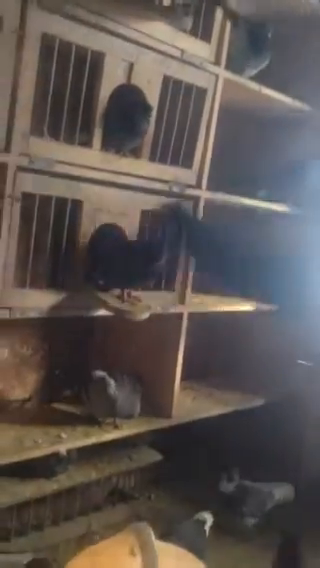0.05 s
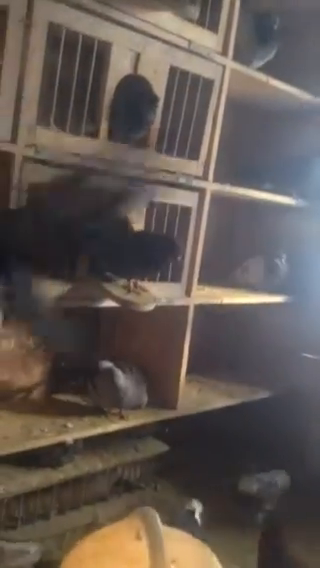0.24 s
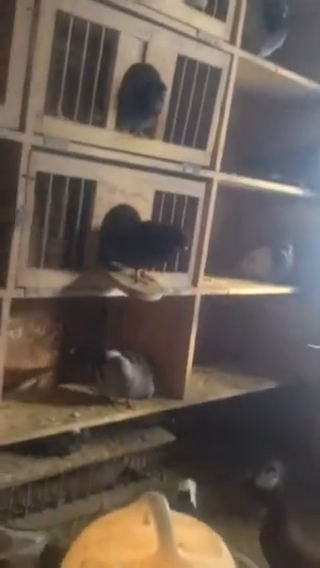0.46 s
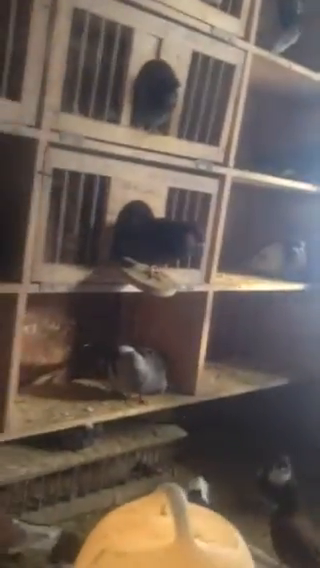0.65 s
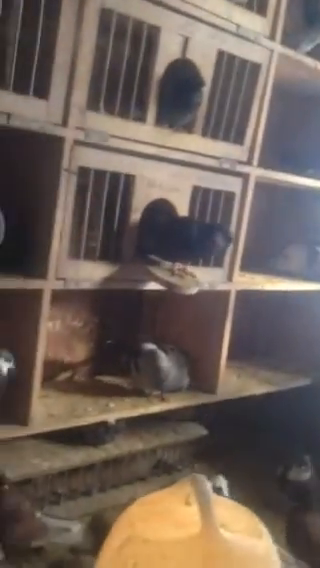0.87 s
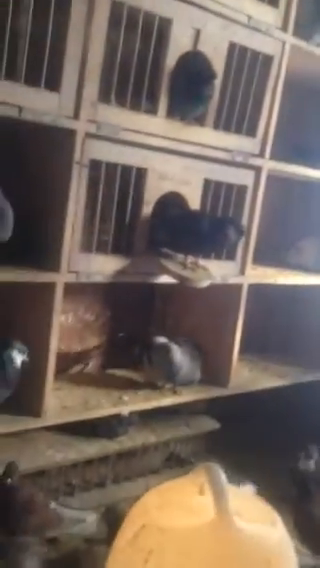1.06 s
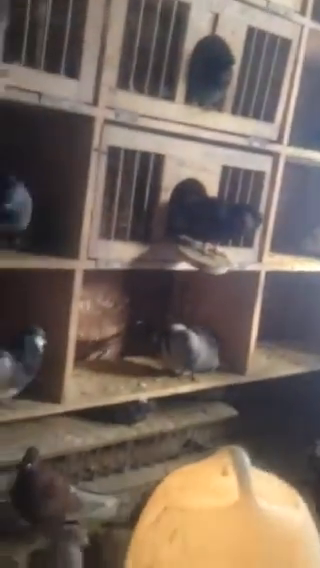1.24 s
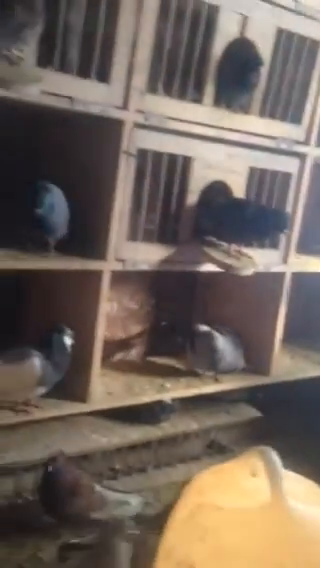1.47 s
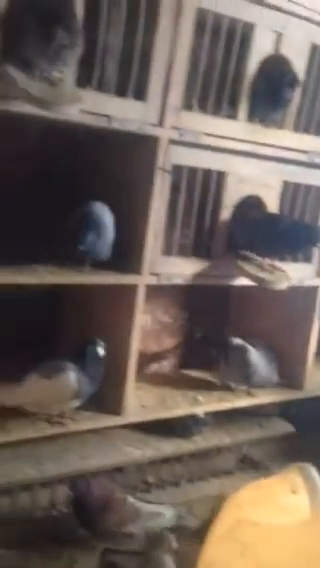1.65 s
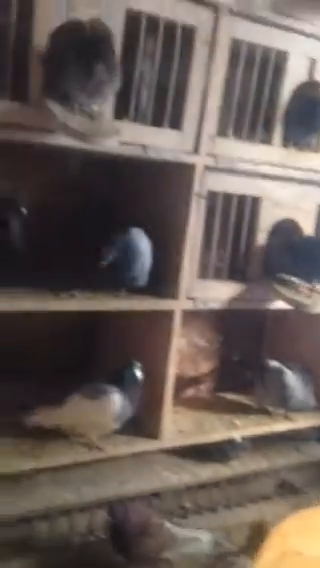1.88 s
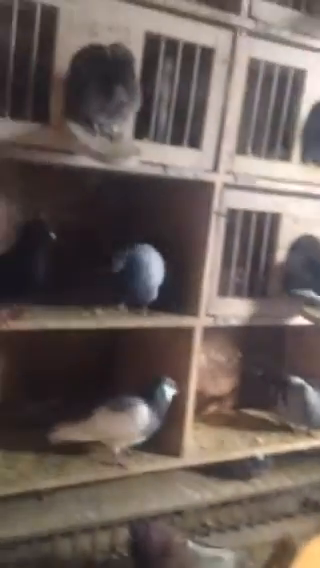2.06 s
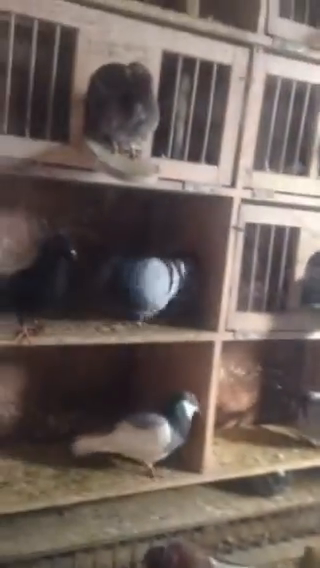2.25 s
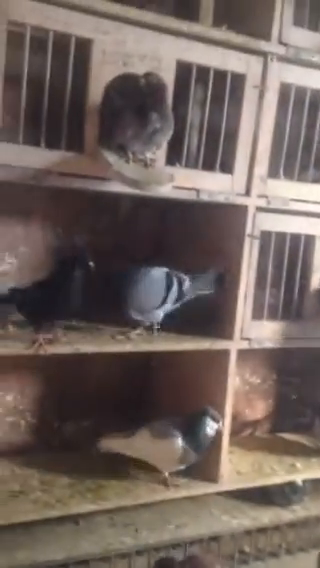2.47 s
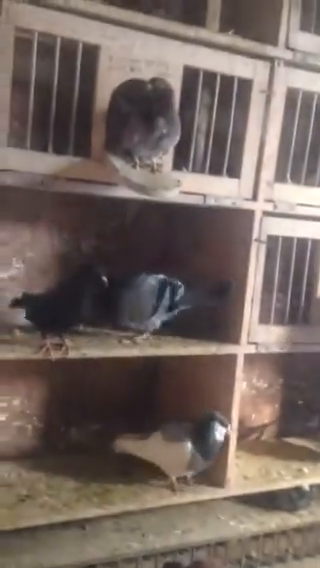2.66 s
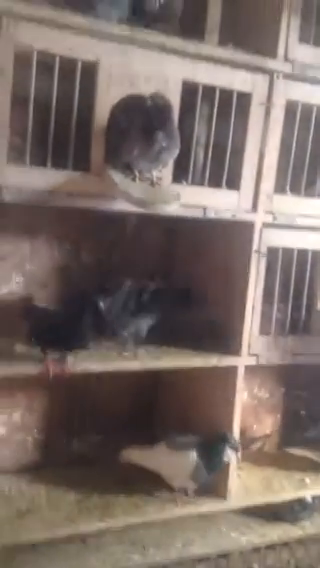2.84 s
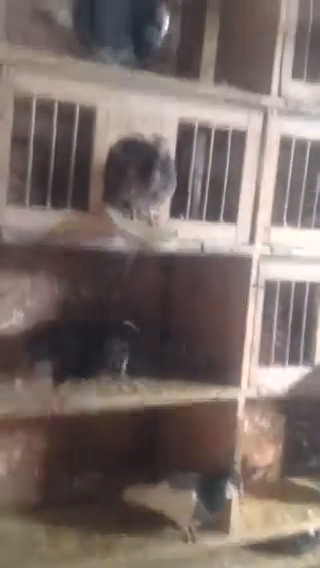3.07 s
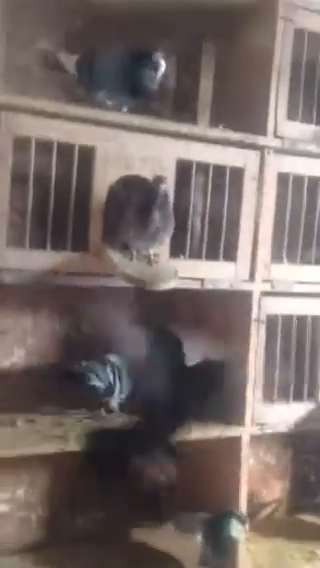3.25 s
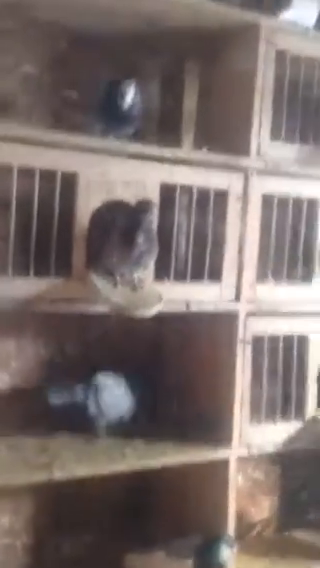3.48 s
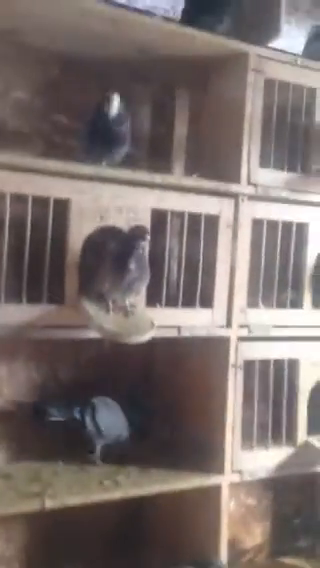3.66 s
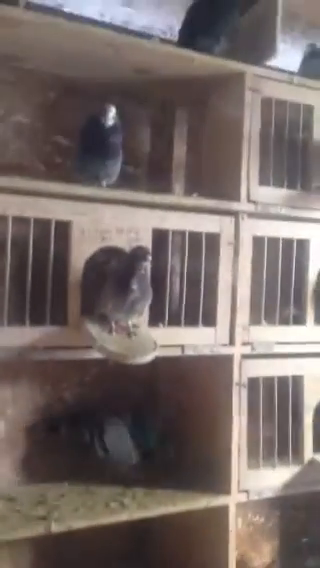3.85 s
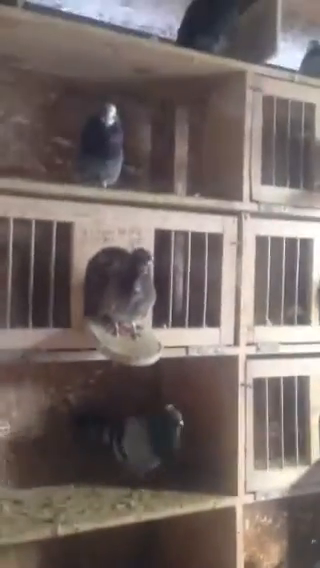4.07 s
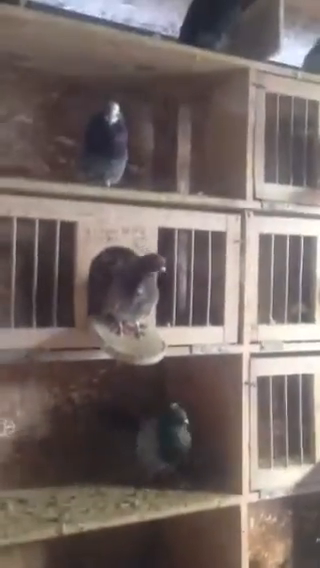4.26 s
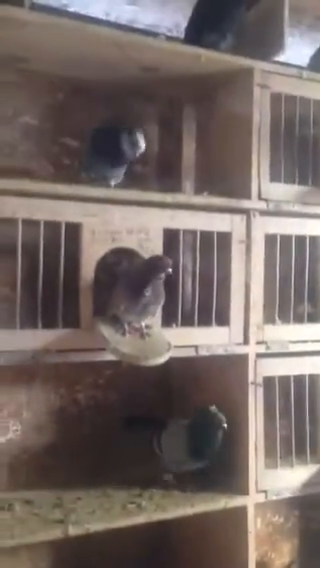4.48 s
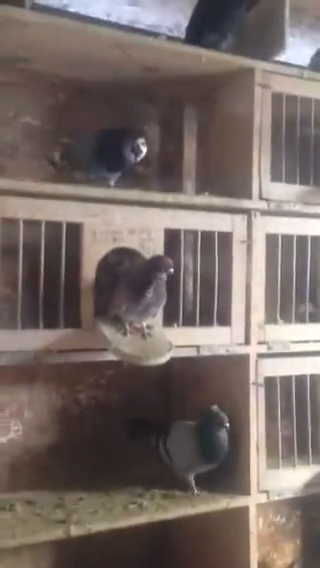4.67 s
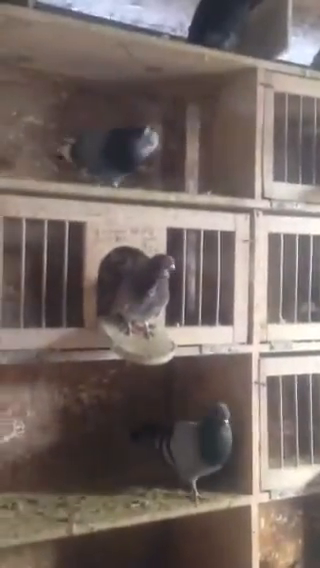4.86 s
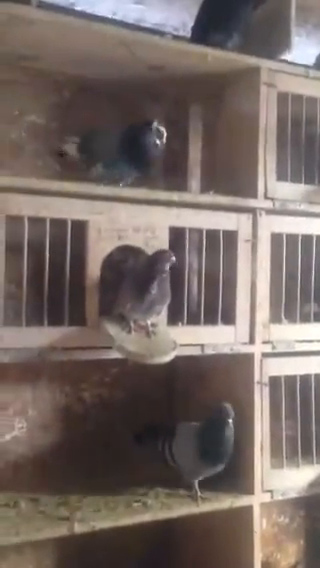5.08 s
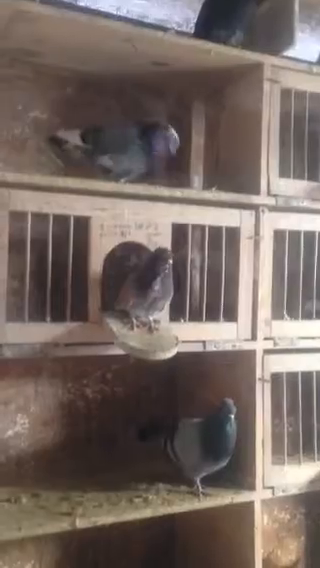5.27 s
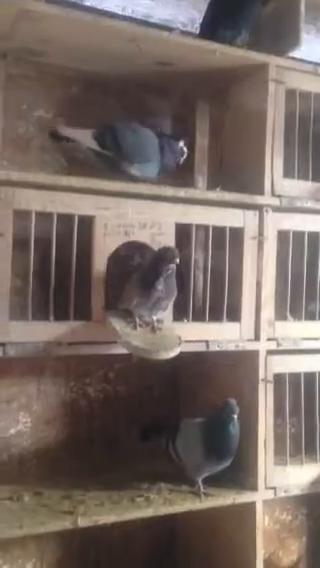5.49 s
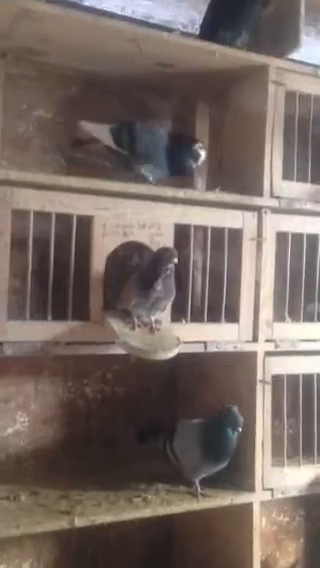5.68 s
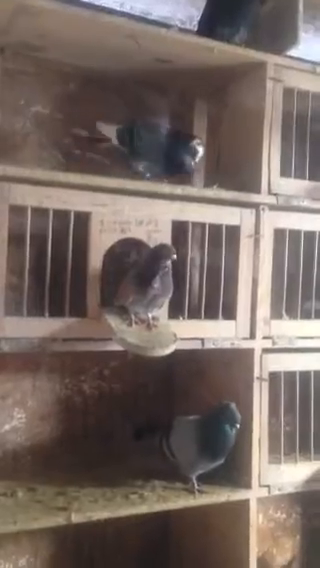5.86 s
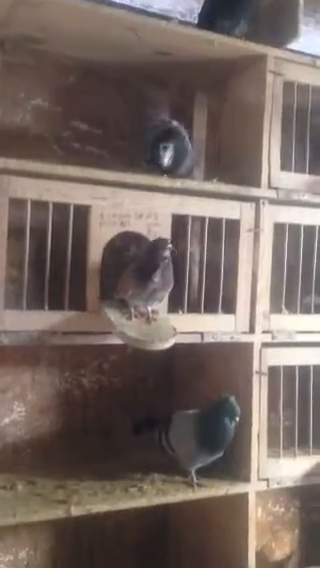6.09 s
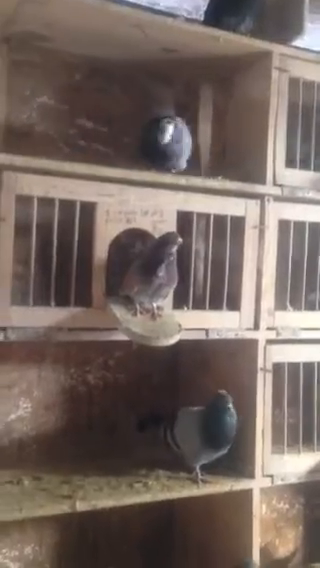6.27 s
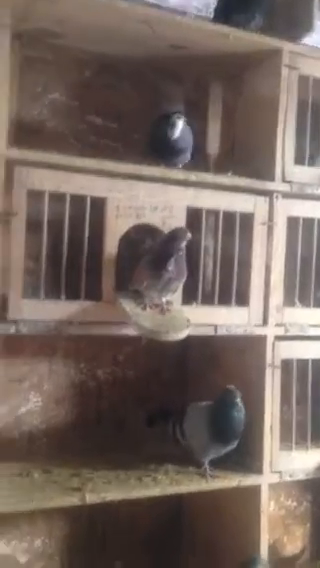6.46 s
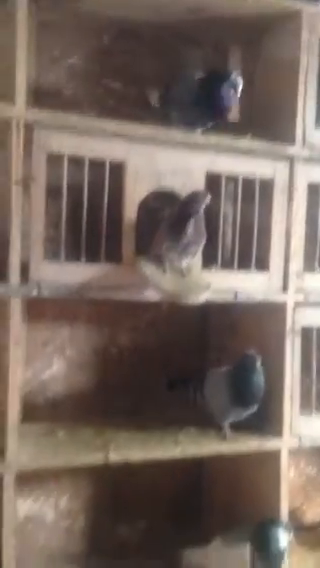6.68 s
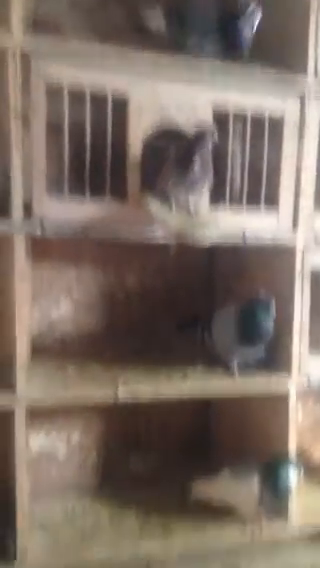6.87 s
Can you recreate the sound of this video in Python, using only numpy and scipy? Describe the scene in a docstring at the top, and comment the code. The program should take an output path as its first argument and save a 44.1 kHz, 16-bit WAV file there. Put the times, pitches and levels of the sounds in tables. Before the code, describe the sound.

Close handheld microphone among pigeons in nest boxes. Hard wing claps and a ringing rattle of bars open the scene, then deep throaty coos overlap with higher moans and abrupt grunts from near birds. Around the middle come sharp wooden knocks, a thud and fluttering feathers. A strong grunt follows, then quieter purring, faint peeps and short soft hoots in a dry room.

```python
"""Inside a small wooden pigeon loft: a rolling chorus of farther birds over still air and low rumble.
At once feet and beaks tap the boards, one bird flies past with clapping wings and a young bird peeps.
Near grunts and full coos, near sines chopped by a rolling throat, then stand out of the chorus; rolled coos
and gliding moans join from the nest boxes. Around 3 s two birds scuffle in a nest box, with bursts of
feather noise, knocks and ringing wood; a few wing strokes follow, and two smooth hoots come near the end."""
import sys
import numpy as np
from scipy import signal
from scipy.fft import rfft, irfft
from scipy.io import wavfile
from scipy.ndimage import uniform_filter1d

SR = 44100
rng = np.random.default_rng(int(sys.argv[2]) if len(sys.argv) > 2 else 0)


def dump(signal):
    """Clip the signal to [-1, 1] and save it as 16-bit WAV at the path in sys.argv[1]."""
    limited = np.clip(np.atleast_2d(signal).T, -1, 1)
    pcm = np.round(limited * 32767).astype(np.int16)
    wavfile.write(sys.argv[1], SR, pcm)


N = 305613
TIME = np.arange(N) / SR  # s


def from_db(db):
    """Amplitude factor of a level in dB."""
    return 10 ** (np.asarray(db) / 20)


def rms_one(x):
    """Scale a sound to rms 1."""
    return x / np.sqrt(np.mean(x ** 2) + 1e-20)


def in_time(rows, t=TIME):
    """The columns of a curve, joined by straight lines."""
    s, *columns = np.transpose(rows)
    return [np.interp(t, s, column) for column in columns]


def drift(rate, t=TIME):
    """Normal random values, a given number a second, joined by straight lines."""
    return np.interp((t - t[0]) * rate, np.arange(1024), rng.standard_normal(1024))


def noise(colour, size=N, tilt_db=0):
    """Noise with a given spectrum, tilted in dB per octave; rms 1."""
    hz = np.fft.rfftfreq(size, 1 / SR) + 1
    points, levels = np.transpose(colour)
    db = np.interp(np.log(hz), np.log(points), levels)
    db = db + tilt_db * np.log2(np.maximum(hz, points[0]))
    low_cut = hz ** 2 / (hz ** 2 + (points[0] / 2) ** 2)
    spectrum = rfft(rng.standard_normal(size)) * from_db(db) * low_cut
    return rms_one(irfft(spectrum, size))


def add(out, start, sound):
    """Mix a sound in from a given time; one due before zero begins at zero."""
    i = max(int(start * SR), 0)
    out[i:i + len(sound)] += sound[:max(N - i, 0)]


LOFT_T60_S = 0.11


def loft(x, first_s=0.00628):
    """Dense reflections from near wooden walls, dying quickly."""
    t = np.arange(SR // 2) / SR
    echoes = rng.standard_normal(len(t)) * from_db(-60 * t / LOFT_T60_S) * (t > first_s)
    return signal.fftconvolve(x, echoes / np.linalg.norm(echoes))[:N]


# rasp of a rolling throat: depth at full roll, and irregularities a second
RASP, RASP_PER_S = .22, 400


def syrinx(t, hz, roll, roll_hz=35, bend=0.077, sharpness=0.71, second_db=-37):
    """A near sine, overtones swallowed by the crop; rolling chops it into raspy, pitch-bending pulses."""
    beat = 2 * np.pi * np.cumsum(roll_hz * np.exp(.24 * drift(25, t))) / SR
    pulses = (.5 + .5 * np.cos(beat)) ** sharpness * from_db(3 * drift(35, t))
    swell = rms_one(1 - roll + roll * 2 * pulses)
    pitch = hz * (1 + roll * (.055 * drift(70, t) - bend * np.sin(beat)))
    phase = 2 * np.pi * np.cumsum(pitch) / SR
    rasp = drift(RASP_PER_S, t) * np.sin(phase) + drift(RASP_PER_S, t) * np.cos(phase)
    octave = from_db(second_db) * np.sin(2 * phase)
    return swell * np.sqrt(2) * (np.sin(phase) + RASP * roll * rasp + octave)


# no bird holds its pitch: share by which it wanders at half roll, and turns a second
WANDER, WANDER_PER_S = 0.01997, 16.11
OVERTONE_DB = -37  # the octave above a call, at half roll


def call(stages, fade_s=0.01186, **throat):
    """A wandering voice passes through stages (t/s, f/Hz, level/dB, roll), opening and closing softly."""
    out = np.zeros(N)
    t = np.arange(stages[0][0] - fade_s / 2, stages[-1][0] + fade_s / 2, 1 / SR)
    hz, db, roll = in_time(stages, t)
    roll = np.clip(roll, 0, 1)
    hz = hz * (1 + WANDER * 2 * roll * drift(WANDER_PER_S, t))
    to_edge_s = np.minimum(t - t[0], t[-1] - t)
    gate = np.sin(np.pi / 2 * np.clip(to_edge_s / fade_s, 0, 1)) ** 2
    second_db = OVERTONE_DB + 20 * np.log10(roll + .5)
    add(out, t[0], gate * from_db(db) * syrinx(t, hz, roll, second_db=second_db, **throat))
    return out


def notes(rows, swell_s, fade_s, sag):
    """Very short sine notes that swell, fade, quaver and sag in pitch."""
    out, t = np.zeros(N), np.arange(SR // 5) / SR - 1 / 10
    shape = np.exp(-(t / np.where(t < 0, swell_s, fade_s)) ** 2)
    for s, db, hz in rows:
        quaver = .035 * drift(300, t)
        pitch = hz * (1 + quaver - sag * np.tanh(t / fade_s))
        phase = 2 * np.pi * (np.cumsum(pitch) / SR + rng.random())
        add(out, s + t[0], from_db(db) * shape * np.sin(phase))
    return out


def struck(blows, modes):
    """A struck body rings with its modes, each a sine dying at its own rate."""
    out, t = np.zeros(N), np.arange(SR // 3) / SR
    for s, db in blows:
        for hz, mode_db, t60 in modes:
            ring = from_db(db + mode_db - 60 * t / t60) * np.sin(2 * np.pi * hz * t)
            add(out, s, rng.choice([-1, 1]) * ring)
    return out


def chorus(low_hz, high_hz, top_hz, count=28):
    """Farther birds overlap at random; each coo rises, holds and sags. Steady level, rms near 1."""
    out, t = np.zeros(N), np.arange(int(.7 * SR)) / SR
    along = t / t[-1]
    arch = np.interp(along, [0, .3, .7, 1], [.88, 1, 1, .75])
    for k, (when, voice) in enumerate(rng.random((count, 2))):
        hz = arch * (low_hz + voice * (high_hz - low_hz))
        coo = np.sin(np.pi * along) * syrinx(t, hz, .7)
        start = (k + when) / count * (TIME[-1] + t[-1]) - t[-1]
        add(out, start, coo[max(int(-start * SR), 0):])  # begins mid-coo if already calling
    band = signal.butter(2, [200, top_hz], "band", fs=SR, output="sos")
    out = signal.sosfilt(band, out + from_db(5.5) * loft(out))
    return out / np.sqrt(uniform_filter1d(out ** 2, SR // 6) + 1e-9)


# the rest of the flock, farther off: t/s, deep voices level/dB, high voices level/dB
FLOCK_LEVELS = [(0,-43,-53.5), (.55,-34.5,-46), (.72,-36.5,-47.5), (.95,-47,-41), (1.19,-44.5,-49),
                (1.9,-43,-44), (2.3,-32,-44), (2.6,-47,-42), (3.3,-43.5,-43), (3.9,-40,-40),
                (4.5,-47,-48.5), (5.8,-44.5,-50.5), (6.12,-49.5,-59.5), (6.6,-46,-70), (6.8,-49.5,-45)]


def flock():
    """A deep and a high chorus, each rising and falling in level."""
    deep_db, high_db = in_time(FLOCK_LEVELS)
    deep = from_db(deep_db) * chorus(285, 400, 455)
    return deep + from_db(high_db) * chorus(410, 520, 780)


def scratches(per_s=35, decay_s=0.006, size_db=-2.5):
    """Claws and feathers brush the boards at random; a gain that rides on the stirring."""
    sizes = from_db(size_db + 3 * np.clip(rng.standard_normal(N), -2, 2))
    touches = (rng.random(N) < per_s / SR) * sizes
    return 1 + signal.lfilter([1], [1, -np.exp(-1 / (decay_s * SR))], touches + 1e-18)


# feathers and feet stirring, before flicker and scratches: t/s, level/dB
STIR_LEVELS = [(0, -53), (.45, -45.5), (.72, -60), (2.03, -62), (3.07, -58), (3.38, -47), (3.9, -54.5),
               (5.38, -61.5), (6.14, -55.5), (6.93, -63)]
# spectrum of a light touch on the boards: f/Hz, relative level/dB per Hz
TOUCH_COLOUR = [(400, 21), (800, 7), (1300, 3.5), (2000, -5.5), (2700, -3), (3600, -2), (5000, -20),
                (8000, -20), (14000, -39)]


def stirring():
    """Feathers and feet: flickering noise roughened by scratches."""
    level = from_db(in_time(STIR_LEVELS)[0] + 2.28 * drift(45))
    return level * scratches() * noise(TOUCH_COLOUR)


# low rumble in the loft, before its waver: t/s, level/dB
RUMBLE_LEVELS = [(.4, -44), (1.1, -52), (3.38, -48.5), (6.2, -53.5), (6.93, -53)]
# its spectrum: f/Hz, relative level/dB per Hz
RUMBLE_SPECTRUM = [(25, -17), (55, -8.5), (80, -1.5), (100, -6), (125, -8), (160, -11.5), (230, -2.5),
                   (400, -26.5), (900, -69.5)]
RUMBLE_WAVER_DB = 2.5


def low_rumble():
    """Low noise whose level wavers at random."""
    level = from_db(in_time(RUMBLE_LEVELS)[0] + RUMBLE_WAVER_DB * drift(14))
    return level * noise(RUMBLE_SPECTRUM)


# spectrum of the still air: f/Hz, relative level/dB per Hz
AIR_COLOUR = [(200, 5.5), (550, 2.5), (750, -13), (1100, -41.5), (1800, -26), (7500, -29), (15000, -32.5)]
AIR_DB = -50.5


def still_air():
    """Steady faint noise of the loft."""
    return from_db(AIR_DB) * noise(AIR_COLOUR)


# feet and beaks on the boards: t/s, level of the wood/dB, f of the knock/Hz
TAP_BLOWS = [(.028, -35, 740), (1.079, -51, 1290), (1.532, -41, 840), (1.539, -42, 2150), (1.959, -42, 815),
             (1.968, -51.5, 1790), (2.335, -47.5, 3360), (3.129, -51, 2700), (3.182, -34.5, 990),
             (3.185, -47, 2270), (3.197, -54, 1060), (3.376, -34, 1030), (4.151, -43, 1580),
             (4.223, -53.5, 2840)]


def taps(sharpness=2.5, click_db=-6):
    """A short scratchy contact wakes one broad resonance of the wood."""
    out, t = np.zeros(N), np.arange(SR // 10) / SR
    fade = np.exp(-t / .003)
    for s, db, hz in TAP_BLOWS:
        contact = noise(TOUCH_COLOUR, len(t))
        wood = rms_one(signal.lfilter(*signal.iirpeak(hz, sharpness, fs=SR), contact))
        add(out, s, from_db(db) * fade * (wood + from_db(click_db) * contact))
    return out


# wing strokes: t/s, crest level before grain/dB, treble tilt/dB per octave, swell/s, hold/s
WING_STROKES = [(0.096,-50,5,0.00072,.002), (0.177,-47,-1.5,0.0052,0.0037), (0.25,-50.5,-1,.004,0.0045),
                (0.298,-31,0.5,0.0032,0.0056), (0.318,-36,-3.5,0.0018,0.0018),
                (0.4234,-31,2,0.00059,0.0066), (0.553,-41.5,-0.5,0.0008,0.0067),
                (3.298,-47.5,-9.5,0.0097,0.013), (3.378,-55,15,.001,0.0065), (3.486,-39,0.5,0.0012,0.0083),
                (3.907,-52,2,0.00078,0.0022), (4.115,-56,1.5,0.0084,.004), (4.145,-54,-1.5,0.011,0.013),
                (4.964,-50,-1,0.0011,0.016)]
# spectrum of the feathers before tilt: f/Hz, relative level/dB per Hz
FEATHER_COLOUR = [(200, -11.5), (600, -0.5), (1000, -0.5), (1700, -2.5), (2450, -2), (3000, -3.5),
                  (4000, -2.5), (5500, -14), (8000, -20.5), (11000, -41.5), (15000, -38)]
# the decay at a middling stroke, and the extra strength that halves it
WING_DECAY_S, WING_MIDDLING_DB, WING_HALVING_DB = 0.013, -45.5, 20


def wings():
    """Puffs of grainy feather noise swell fast, hold and die away, the sooner the harder the stroke."""
    out, t = np.zeros(N), np.arange(SR // 4) / SR - 1 / 20
    for s, db, tilt_db, swell_s, hold_s in WING_STROKES:
        decay_s = WING_DECAY_S * .5 ** ((db - WING_MIDDLING_DB) / WING_HALVING_DB)
        grain_db = 2.2 * drift(900, t) + 1.5 * drift(180, t)
        shape = np.exp(np.minimum(t, 0) / swell_s - np.maximum(t - hold_s, 0) / decay_s)
        feathers = noise(FEATHER_COLOUR, len(t), tilt_db)
        add(out, s + t[0], from_db(db + grain_db) * shape * feathers)
    return out


# a squab's peeps and lower squeaks (crests due before 0.1 s fall at 0.1 s): t/s, crest level/dB, f/Hz
PEEP_NOTES = [(.025, -46.5, 723), (.022, -54, 1433), (.69, -60, 3730), (2.335, -42, 660), (2.865, -47, 840),
              (5.645, -60, 3590), (5.72, -61.5, 3490), (5.775, -60, 3680), (6.42, -48, 936)]


def peeps():
    """A young bird's brief notes, barely sagging in pitch."""
    return notes(PEEP_NOTES, swell_s=0.0063, fade_s=0.013, sag=0.015)


# short grunts that stand out of the cooing: t/s, crest level/dB, f/Hz
GRUNT_NOTES = [(.234,-26,351), (.312,-21.5,350), (1.431,-24,339.8), (1.86,-21.5,349.4), (3.201,-23.5,361.6),
               (3.542,-23.5,389), (3.829,-16,363.7), (4.193,-25,404.4), (4.957,-32.5,320.4),
               (5.412,-33,415), (5.765,-21.5,379.6), (6.69,-29.5,400)]


def grunts():
    """Near voices give very short notes that drop in pitch."""
    return notes(GRUNT_NOTES, swell_s=.0046, fade_s=.0077, sag=0.063)


# a bird's weight landing on a shelf: t/s, level/dB to which each mode's level is added
LANDINGS = [(.301, -58), (.428, -51.5), (3.184, -50), (3.487, -58)]
# modes of the shelf: f/Hz, level relative to the landing/dB, t60/s
SHELF_MODES = [(89, -21, 0.42), (120, 15.5, 0.1), (199.3, 15.5, 0.16), (280, -6, 0.37), (640, 13.5, 0.068)]


def thumps():
    """A landing sets the wooden shelf ringing, mostly low."""
    return struck(LANDINGS, SHELF_MODES)


# bars of a nest front: f/Hz, level/dB, t60/s
BAR_MODES = [(1286,-51,0.17), (1770,-37.5,0.1), (2020,-37,0.099), (2370,-28,0.068), (2403,-30.5,0.06),
             (2500,-26.5,0.047), (3650,-38,.1)]
BARS_S = .302


def bars():
    """The nest front rings once, clipped by a hard wing stroke."""
    return struck([(BARS_S, 0)], BAR_MODES)


# full coos of the birds nearest the microphone: roll 0-1, then stages of t/s, f/Hz, level/dB
FULL_COOS = [(0.21, [(.36,366.7,-33), (.445,359.1,-22.5), (.525,354.3,-29), (.57,344,-24), (.615,345,-17.5),
             (.635,344.7,-27), (.685,326.6,-33.5), (.78,254,-44.5)]), (0.55, [(1.72,350.3,-29),
             (1.77,350.8,-30), (1.83,344,-40.5), (1.95,355,-30.5), (2.04,349,-32), (2.078,344.2,-22),
             (2.125,349.9,-34.5), (2.22,349.3,-26), (2.275,314,-41), (2.355,245,-34), (2.41,217,-37)]),
             (0.597, [(3.68,358.5,-31), (3.82,357.3,-31), (3.895,364.4,-33), (3.94,352.6,-25),
             (4.045,300.6,-35.5), (4.07,276,-37), (4.11,262,-37.5), (4.17,222,-37)]),
             (0.383, [(5.2,371.4,-49), (5.31,374.9,-34), (5.37,368.7,-47.5), (5.5,372.1,-36),
             (5.62,366.2,-42), (5.755,374.5,-33), (5.8,376.3,-44), (5.89,375.8,-28.5), (6.01,382.5,-41.5),
             (6.31,360.8,-48.5)])]
# a full coo rolls less as its pitch slides down
COO_SMOOTH_HZ, COO_ROLLING_HZ = 220, 340


def full_coo(roll, stages):
    """One unbroken voice: it rolls on its top pitch and smooths out as it slides down."""
    rolling = [COO_SMOOTH_HZ, COO_ROLLING_HZ]
    return call([(s, hz, db, roll * np.interp(hz, rolling, [0, 1])) for s, hz, db in stages])


# rolled coos from the nest boxes, before their 1 dB cut in scene():
# start t/s, crest t/s, end t/s, crest f/Hz, crest level/dB, roll 0-1
ROLLED_COOS = [(0.835, 0.929, 1.144, 392, -34.5, 0.79), (1.425, 1.496, 1.62, 372, -34.5, 0.6),
               (2.277, 2.451, 2.72, 378.2, -32.5, 0.45), (2.901, 3.02, 3.33, 393, -35, 0.46),
               (3.302, 3.463, 3.68, 374, -36, 0.69), (4.059, 4.196, 4.42, 386.3, -36.5, 0.57),
               (4.514, 4.716, 4.77, 369.7, -37, 0.5), (4.778, 4.883, 5.17, 362.7, -34.5, 0.49)]
ROLLED_HZ_PER_DB = 4  # pitch rises with effort
ROLLED_SWELL_DB, ROLLED_FADE_DB = 5, 8  # rise to the crest, fall after it
# throat pulses: rate, share by which each bends the pitch at full roll, and narrowness
ROLLED_PER_S, ROLLED_BEND, ROLLED_SHARPNESS = 32, .07, 1.3


def rolled_coo(start, crest, end, hz, db, roll):
    """A purring coo that swells and fades, its pitch following the effort."""
    return call([(start, hz - ROLLED_HZ_PER_DB * ROLLED_SWELL_DB, db - ROLLED_SWELL_DB, roll),
                 (crest, hz, db, roll),
                 (end, hz - ROLLED_HZ_PER_DB * ROLLED_FADE_DB, db - ROLLED_FADE_DB, roll)],
                roll_hz=ROLLED_PER_S, bend=ROLLED_BEND, sharpness=ROLLED_SHARPNESS)


# gliding moans, high and low, before their 1 dB cut in scene():
# start t/s, length/s, first f/Hz, middle f/Hz, last f/Hz, crest level/dB, roll 0-1
GLIDING_MOANS = [(.89,0.082,477,523,532,-37.5,0.5), (1.12,0.25,215.8,254.6,255,-40,0.47),
                 (1.28,0.068,493,482,496,-43,0.5), (1.613,0.18,404.8,433,423,-37.5,0.21),
                 (1.78,0.13,540,557,560,-44,0.45), (2.09,0.22,505.6,519.6,512,-43,0.7),
                 (2.33,0.22,454.4,479,502,-37.5,0.43), (2.56,0.14,545,491,385,-36,0.26),
                 (2.73,0.15,581,445,360,-34,0.34), (2.82,0.22,496.4,494.6,526,-39,0.45),
                 (2.82,0.17,255,237,232,-45.5,0.2), (3.24,0.22,216.7,260.5,263,-43.5,0.24),
                 (3.448,0.14,212,256,280,-45.5,0.2), (3.92,0.18,521,451.5,403,-34.5,0.37),
                 (4.08,0.31,458,506.7,505,-39.5,0.25), (4.4,0.087,292,295,302,-42,0),
                 (5.23,0.57,450,495,521,-44.5,0.7), (5.38,0.21,422,433.5,422,-39,0.36),
                 (5.62,0.38,470.3,445.5,434.3,-41,0.5), (6.65,0.036,281,265,260,-41,.2),
                 (6.8,0.12,563,419.4,420,-46,0.13)]
# every moan swells to a crest (share of its length) and fades
MOAN_CREST, MOAN_SWELL_DB, MOAN_FADE_DB = 0.54, 2.5, 2


def moan(start, length, first_hz, middle_hz, last_hz, db, roll):
    """A note that glides along an arc through three pitches."""
    along = np.linspace(0, 1, 9)
    arc = np.polyfit([0, .5, 1], [first_hz, middle_hz, last_hz], 2)
    hz = np.polyval(arc, along)
    level = db - np.interp(along, [0, MOAN_CREST, 1], [MOAN_SWELL_DB, 0, MOAN_FADE_DB])
    return call([(start + a * length, f, d, roll) for a, f, d in zip(along, hz, level)])


# smooth near hoots: start t/s, length/s, middle f/Hz, held level/dB
SMOOTH_HOOTS = [(6.333, 0.043, 346, -26.5), (6.545, 0.13, 338.2, -29)]
# a hoot swells, holds and fades while its pitch sinks
HOOT_EDGE_DB, HOOT_SAG_HZ, HOOT_ROLL = 7, 9.3, 0.13


def hoot(start, length, hz, db):
    """A nearly pure note: attack, hold and release take a third each."""
    opens, full, eases, closes = np.linspace(start, start + length, 4)
    return call([(opens, hz + HOOT_SAG_HZ, db - HOOT_EDGE_DB, HOOT_ROLL),
                 (full, hz, db, HOOT_ROLL),
                 (eases, hz, db, HOOT_ROLL),
                 (closes, hz - HOOT_SAG_HZ, db - HOOT_EDGE_DB, HOOT_ROLL)])


def scene():
    """Near voices, nest boxes, the flock, movement and the still air of the loft."""
    coos = sum(full_coo(*row) for row in FULL_COOS) + sum(hoot(*row) for row in SMOOTH_HOOTS)
    voices = coos + grunts() + peeps()
    boxes = sum(rolled_coo(*row) for row in ROLLED_COOS) + sum(moan(*row) for row in GLIDING_MOANS)
    nests = from_db(-1) * (boxes + from_db(-5) * loft(boxes))
    movement = taps() + wings() + thumps() + bars()
    near = voices + from_db(-8.5) * loft(voices) + movement + from_db(-9) * loft(movement)
    return (near + nests + flock() + stirring() + low_rumble() + still_air())[None]


CUTOFF_HZ = 15400


def record(dry):
    """The top is cut steeply."""
    return signal.sosfilt(signal.ellip(12, .1, 80, CUTOFF_HZ, fs=SR, output="sos"), dry)


dry = scene()
out = record(dry)
dump(out)
```